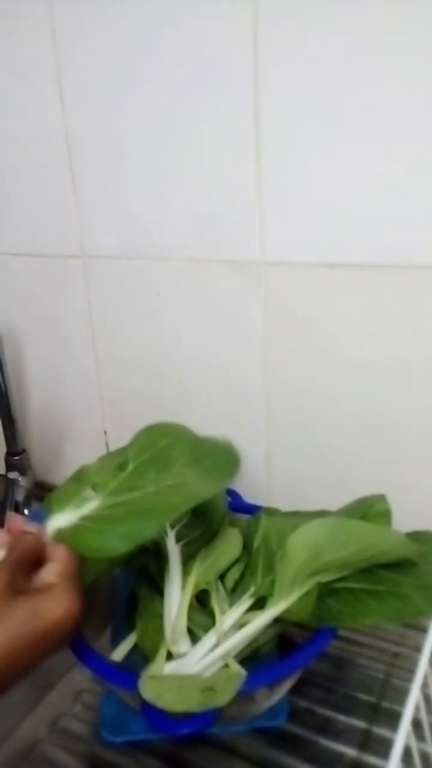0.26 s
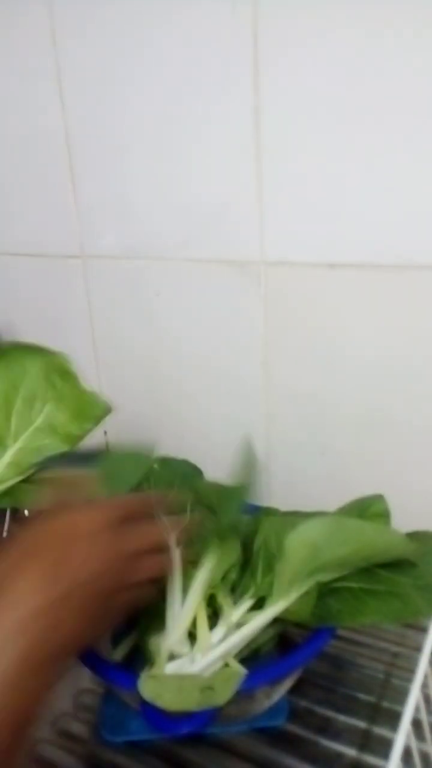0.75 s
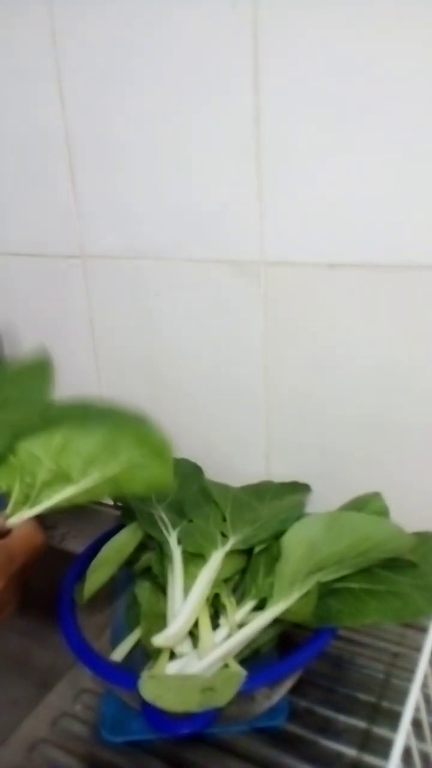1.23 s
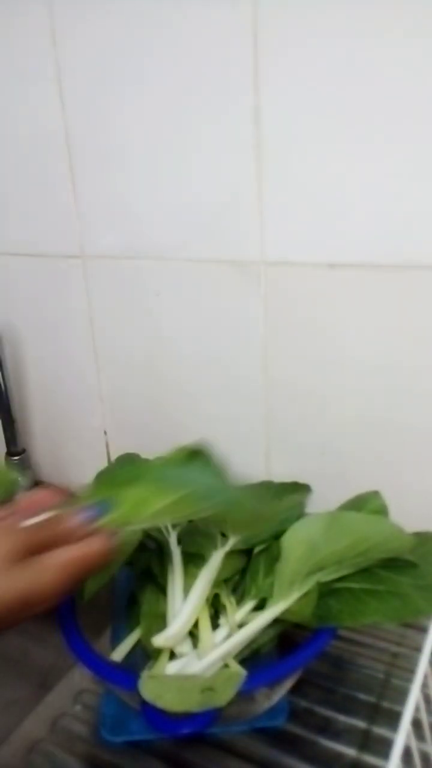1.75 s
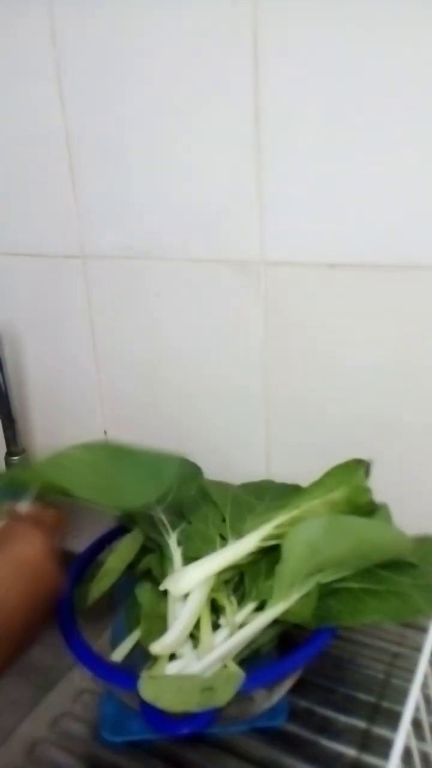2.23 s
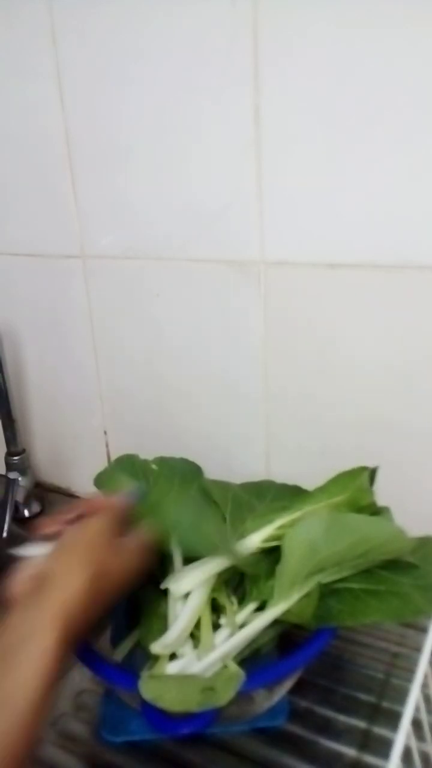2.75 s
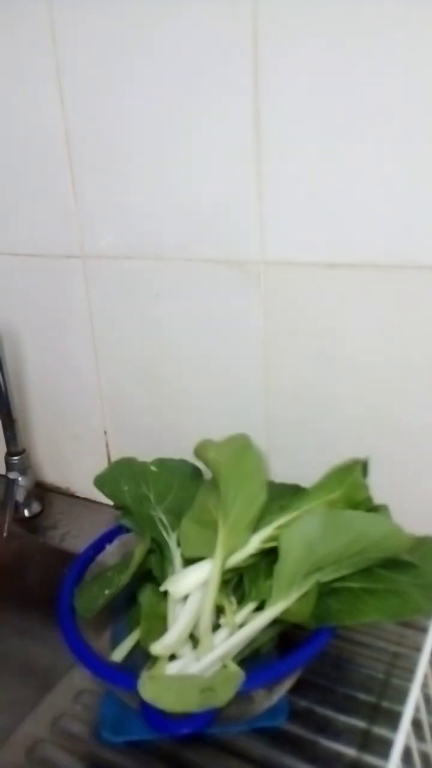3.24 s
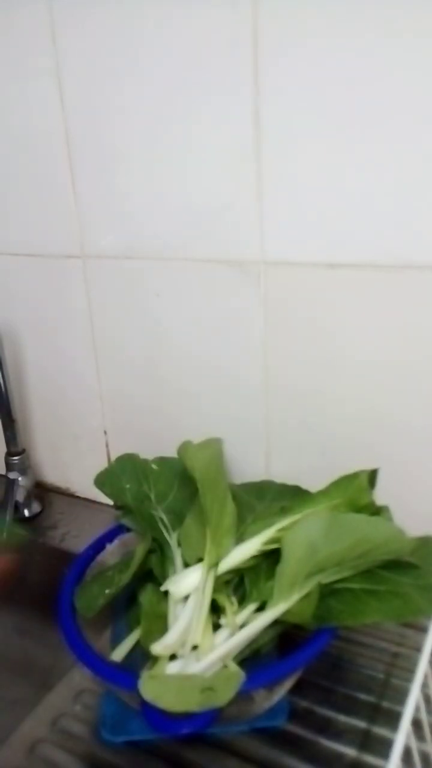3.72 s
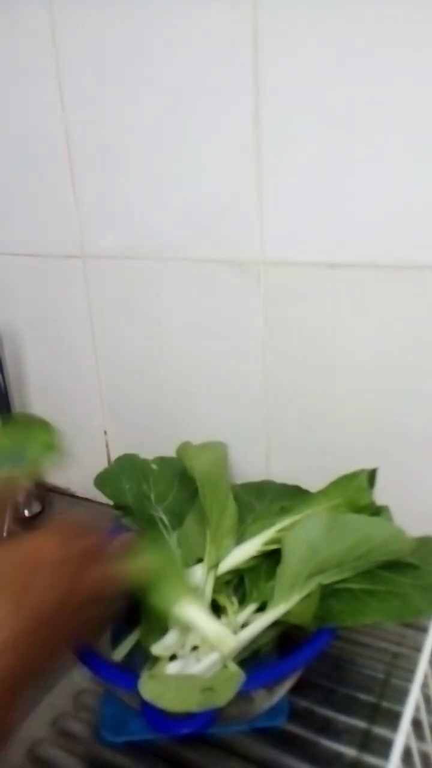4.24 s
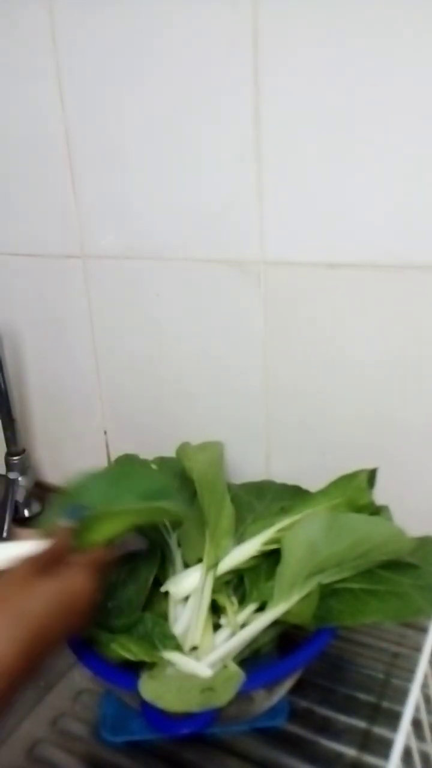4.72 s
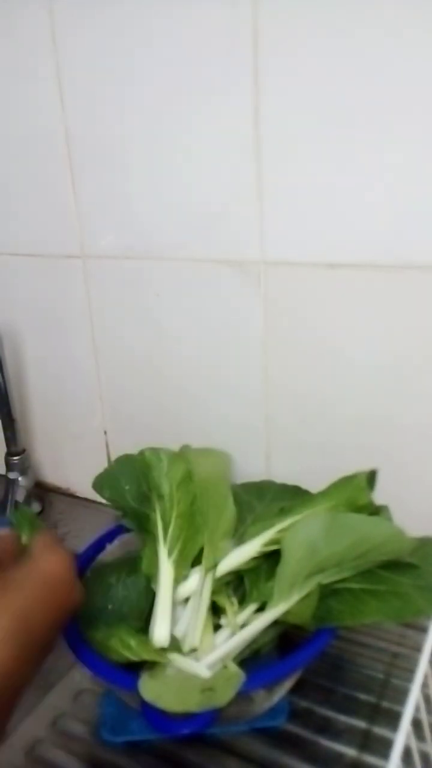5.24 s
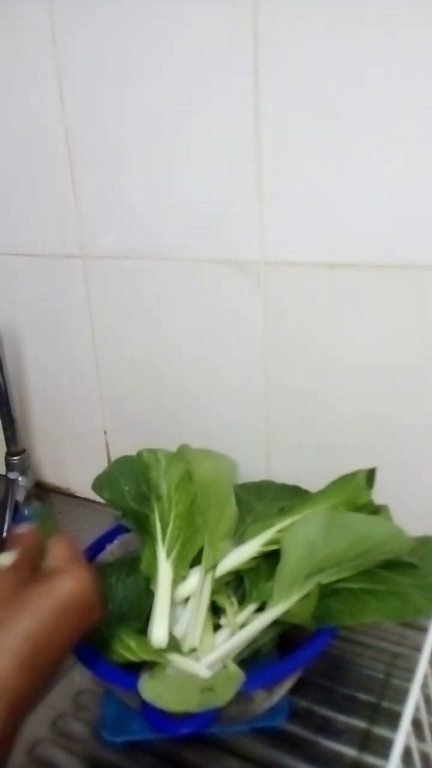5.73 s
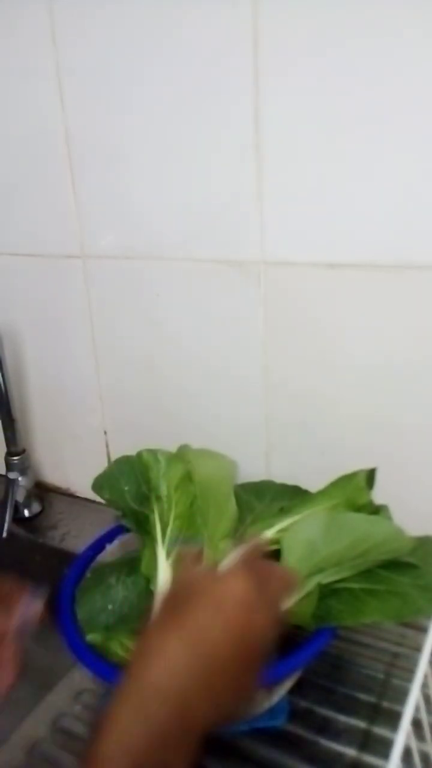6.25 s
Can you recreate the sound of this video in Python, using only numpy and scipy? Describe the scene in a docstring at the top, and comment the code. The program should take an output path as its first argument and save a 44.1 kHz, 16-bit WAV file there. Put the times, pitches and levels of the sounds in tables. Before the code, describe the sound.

Bok choy stalks snap in short, crisp clusters about once a second, with soft rubbing and crackling of wet leaves in between. A little over two seconds in, a small knife clinks once as a stalk breaks and a plastic basin knocks. More snaps, rustles and a few tiny squeaks follow. A low machine hum runs underneath, heard from nearby in a small tiled kitchen.

```python
"""At a tiled kitchen sink, bok choy leaves are snapped off with a small knife and dropped in a plastic basin.
The crisp stalks fail by brittle fracture, fibre by fibre, while stick-slip friction makes the wet leaves
rub, crackle and squeak. Impacts excite damped modes: the blade clinks once and the basin thuds softly.
Under it all a machine drones, and the small, hard room adds early reflections and a short reverberation."""
import sys
import numpy as np
from scipy import signal
from scipy.fft import rfft, irfft
from scipy.io import wavfile
from scipy.ndimage import uniform_filter1d

SR = 44100
rng = np.random.default_rng(int(sys.argv[2]) if len(sys.argv) > 2 else 0)


def file_out(sig):
    """Save sig as 16-bit WAV at sys.argv[1]."""
    # one column per channel
    cols = np.atleast_2d(sig).T
    # limit, then scale
    lim = np.clip(cols, -1, 1)
    pcm = np.round(lim * 32767).astype(np.int16)
    wavfile.write(sys.argv[1], SR, pcm)


N = 285723
TIME = np.arange(N) / SR

# Reverberation of the room. Each row: frequency in Hz, time to decay by 60 dB in seconds.
ROOM_T60 = [(200, 0.55), (1300, 0.043), (3500, 0.45), (7000, 0.3), (10000, 0.27), (15800, 0.26),
            (16500, 0.078)]
# Faint background hiss. Each row: frequency in Hz, spectral density in dB.
HISS_SPECTRUM = [(25, -100), (60, -107), (110, -89), (250, -99.5), (500, -94), (1000, -104), (1900, -111),
                 (2650, -109), (3300, -107), (3900, -118), (4800, -116), (6000, -107), (6600, -106),
                 (7050, -103), (7500, -110), (8000, -125), (10000, -128), (13800, -129), (15100, -118),
                 (15700, -118), (16050, -145)]
# The machine's low, hollow and airy resonances.
# Each row: frequency in Hz, nominal width in Hz, relative level in dB.
DRONE_MODES = [(85.4, 34, 3), (89.3, 6.6, 5), (186.5, 14.3, 14.5), (211.3, 7.4, 8.5), (346.5, 61, 16.5),
               (437.5, 19, 10)]
HOLLOW_MODES = [(571, 55, -1), (640.4, 63, 0.5), (788, 58, 2.5), (870, 71, 4.5), (1065, 35, 3),
                (1150.6, 62, 9.5), (1567.5, 42, 0), (1672, 99, -3.5)]
AIRY_MODES = [(2260, 237, 1), (2980, 75, -1.5), (3184, 193, -1), (6880, 490, -1.5)]
# Slow drift of the drone. Each row: time in seconds, level in dB.
DRONE_DRIFT = [(0, -56), (1.1, -55.5), (1.9, -53.5), (2.9, -56), (3.6, -57), (4.6, -57), (5.5, -55.5),
               (6.48, -53)]
# Brief dips and swells of the hum. Each row: centre in seconds, half width in seconds,
# change of the low hum in dB, change of the hollow part in dB.
HUM_DIPS = [(.14, 0.065, 3, 5), (.62, 0.063, 5.5, 1.5), (.95, 0.031, 7.5, 3), (1.24, 0.12, -5, -1.5),
            (1.44, 0.038, -16, 3.5), (1.58, 0.042, 2.5, 0), (1.81, 0.061, 3, 5), (2.18, 0.04, -16, -5),
            (2.5, 0.04, 2.5, 4.5), (3.02, 0.11, 2, 4), (3.29, 0.046, -7, -4.5), (3.69, 0.043, -10, -10),
            (3.86, 0.045, 3, -5), (4.0, 0.018, 3.5, 6), (4.21, 0.11, -7.5, -5), (4.42, 0.028, 4, -0.5),
            (4.78, .1, 5, 3.5), (5.08, 0.029, -25, -5), (5.26, 0.043, -6, -3.5), (5.45, 0.13, 0, 2.5),
            (5.63, 0.039, -9, 0), (5.75, 0.065, 6, 7), (5.94, 0.041, -1.5, -8), (6.07, .025, -4, -9),
            (6.39, 0.086, 2, 4)]
# Strokes of the hand through the leaves. Each row: start in seconds, length in seconds,
# gain of the fine slips in dB, gain of the dull drag in dB.
HAND_STROKES = [(0, 0.22, -62.5, -59), (0.236, 0.19, -67, -65), (0.382, 0.14, -64.5, -65.5),
                (0.59, 0.064, -65, -64), (0.746, 0.17, -60, -60), (0.983, 0.13, -55.5, -55),
                (1.342, 0.14, -60.5, -59.5), (1.576, 0.085, -69.5, -70), (1.74, 0.16, -64, -59.5),
                (1.925, 0.09, -61, -66), (2.282, 0.22, -62.5, -60.5), (2.61, 0.29, -66, -72),
                (2.977, 0.23, -68.5, -72), (3.322, 0.065, -57, -66), (3.462, 0.13, -68, -67.5),
                (3.764, 0.11, -64.5, -61.5), (3.97, 0.044, -60, -60), (4.294, 0.24, -64.5, -63),
                (4.654, 0.21, -68, -64), (5.008, 0.048, -63, -81), (5.297, 0.17, -66, -77),
                (5.65, 0.044, -64.5, -65), (6.091, 0.061, -61.5, -57.5), (6.29, 0.075, -70, -61)]
# Friction spectra of fine slips between leaves and of a hand dragging along a stalk.
# Each row: frequency in Hz, relative density in dB.
SLIP_SPECTRUM = [(600, -44), (1500, 6), (2400, 7), (4300, 3), (5200, 7), (6500, 9.5), (7400, -2),
                 (8300, -53), (13600, -45), (15000, -21), (16000, -18)]
DRAG_SPECTRUM = [(50, -6), (200, 1.5), (480, -5.5), (900, -1.5), (1350, 1.5), (1620, -1.5), (1950, -3.5),
                 (2400, -7.5), (3300, -18.5), (6000, -49)]
# Wet leaves brush past each other, and wet stalks squeak under the fingers.
# Each row: start in seconds, level in dB, pitch in Hz, length in seconds.
LEAF_BRUSHES = [(0.262, -82, 10500, .03), (0.429, -67, 5830, 0.055), (0.58, -72, 4770, 0.014),
                (0.641, -69, 5900, 0.065), (0.643, -84, 10000, .025), (0.768, -76, 6740, 0.032),
                (.815, -78, 9700, 0.016), (0.982, -81, 9800, .02), (1.152, -76, 8500, 0.021),
                (1.508, -81, 9200, 0.021), (1.923, -80, 9200, 0.045), (2.005, -80, 9500, 0.03),
                (2.037, -70, 4360, 0.025), (2.218, -79, 10300, .02), (2.531, -71, 6400, 0.016),
                (2.534, -80, 11500, 0.023), (2.696, -68, 6400, 0.051), (2.81, -84, 9700, 0.024),
                (3.777, -87, 8500, 0.091), (4.01, -81, 9800, 0.042), (5.362, -86, 10400, 0.02),
                (5.408, -75, 9000, 0.015), (5.685, -86, 9900, 0.035), (5.836, -80.5, 11600, 0.022),
                (6.093, -79, 10400, 0.037), (6.191, -83, 9300, .05), (6.324, -84, 8800, 0.038)]
STALK_SQUEAKS = [(0.236, -61, 2430, 0.01), (1.923, -50, 4030, 0.0096), (1.937, -68, 4000, 0.018),
                 (3.836, -69, 3900, 0.0062), (5.815, -73, 4470, 0.0086), (6.466, -67, 3880, 0.012)]
# Soft touches of leaf on leaf. Each row: start in seconds, level in dB, pitch in Hz,
# top-octave sheen in dB, rise time in seconds.
LEAF_TOUCHES = [(.268, -54.5, 2800, 5, .004), (.572, -55, 3300, -13, 0.0048), (.652, -55, 4500, 3, .003),
                (.675, -50, 2800, -14, 0.0049), (.805, -53, 2900, -14, 0.0039),
                (.843, -39, 4200, -6, 0.0065), (1.768, -50, 3000, -14, 0.0083),
                (1.789, -47, 3500, -11, 0.0055), (2.042, -45, 4000, -0.5, 0.0036),
                (4.998, -47, 4000, 1, 0.0065), (5.338, -52.5, 4600, -1, 0.0053),
                (5.369, -62, 5500, 5, .003), (5.414, -62, 4800, 5, 0.0049), (5.427, -44.5, 3280, -2, .002),
                (6.161, -51, 4800, 5, 0.0051), (6.204, -50, 7000, -6, 0.0044)]
# Modes of the plastic basin. Each row: ratio to the pitch, relative level in dB.
BASIN_MODES = [(.78, -18), (1, -6), (1.27, -12.5), (1.9, -14), (2.9, -25)]
# Blows on the basin. Each row: start in seconds, gain in dB, pitch in Hz, T60 at that pitch in seconds.
BASIN_BLOWS = [(2.369, -23, 456, 0.015), (3.402, -41, 173, 0.046), (4.392, -59, 186, 0.1),
               (4.403, -55, 173, 0.065)]
# Modes of the blade. Each row: frequency in Hz, relative level in dB, T60 in seconds.
BLADE_MODES = [(3624, -13, 0.15), (3735, -8, 0.072), (3800, -13, .055), (4020, -3.5, 0.046),
               (4330, -6, .03), (4800, -2.5, 0.02), (5500, 0, 0.012), (6600, -5.5, .11), (6150, -15, 0.15),
               (6595, 2.5, 0.03)]
# The blade knocks as it comes through a stalk. Each row: start in seconds, gain in dB.
BLADE_KNOCKS = [(2.3690, -30.5)]
# The spectrum all cracks share. Each row: frequency in Hz, relative density in dB.
CRACK_SPECTRUM = [(50, -21), (150, -9.5), (500, -6.5), (1000, -6.5), (1700, -3), (2600, -1.5), (3800, -6),
                  (5200, -6), (6500, 2), (7300, -4.5), (8300, -11.5), (13600, -17), (14800, -3),
                  (15800, -4), (16200, -32), (16900, -26)]
# Cracks of stalks and leaves. Each row: start in seconds, level in dB, pitch in Hz, fleshy body in dB,
# top-octave sheen in dB, glassy edge in dB, time scale of the tear in seconds.
STALK_CRACKS = [(.0038, -30, 3450, -6, 1, 1, 0.00055), (.0153, -36.5, 2870, 1, -2, -1, 0.0011),
                (.0415, -38.5, 6330, -2, -1, -3, 0.00021), (.0774, -39, 3970, -4, -1, 2, .0003),
                (.095, -45, 3120, -5, 3, 4, 0.00035), (.1189, -38, 5600, 1, 0, -2, 0.00027),
                (.1258, -35, 3840, 2, 1.5, -1, 0.00027), (.705, -46, 2350, 4, -23, -7, .0015),
                (.8637, -36, 3650, 1, -2, 3, 0.00063), (1.0144, -37, 4100, -8, 3, -6, 0.00076),
                (1.0225, -45, 3500, -6, -6, -4, 0.00056), (1.037, -31.5, 4000, 1, 2, -3, .0009),
                (1.0452, -39, 3600, -10, -3, -4, .0007), (1.0562, -33, 4000, 4, 5, -2, .0005),
                (1.064, -42, 3500, -8, -2, -3, .0008), (1.0755, -34.5, 4400, 4, 3, -1, .0009),
                (1.087, -48, 3300, 3, -4, -3, .0008), (1.099, -44, 3800, 0, 2, 0, 0.00064),
                (1.199, -49, 6200, -5, 4, 9, .0008), (1.3257, -34.5, 5030, -1, 2.5, 4, 0.0016),
                (1.343, -47, 5000, -1, 5, 1, .0004), (1.3985, -42.5, 6650, -1, -2, -6, .0012),
                (1.4423, -39, 3760, -1, 5, -4, .0023), (1.4472, -35.5, 5900, -4, -0.5, -7, 0.0013),
                (1.7827, -42, 2100, 0, -23, -12, 0.00058), (1.9683, -44, 6500, -13, -2, -8, 0.00049),
                (1.974, -43, 6660, -10, -6, 3, .0009), (2.1385, -49.5, 7500, -8, 5, 4, .0003),
                (2.2419, -43.5, 6740, -11, 9, -3, .0006), (2.2556, -43, 5370, -3, -8, 0, 0.00066),
                (2.2868, -42, 5770, 5, 5, -1, .001), (2.2945, -42.5, 6160, -7, 2, -3, 0.0016),
                (2.3688, -31, 6000, -2, 15, 0.5, 0.0014), (2.3703, -34, 4140, -8, -5, 0, .0008),
                (2.3733, -33.5, 6300, -5, -5, 3, 0.00073), (2.3767, -35.5, 3950, 5.5, -11, -2, .0012),
                (2.3864, -35.5, 4800, -1, 2, 3, .0018), (2.3975, -39, 3700, -4, 9, 2, 0.00064),
                (3.3424, -43.5, 6100, -13, -1, -3, 0.00076), (3.3591, -33, 4030, -8, 2, -5, 0.0013),
                (3.3615, -35.5, 2680, -8, -14, -2, 0.0016), (3.3715, -42, 5200, -4, 7, 2, .001),
                (3.3978, -46, 3700, 1, 10, 1, .0008), (3.403, -41.5, 4020, 3, 4, -3, 0.0011),
                (3.8427, -48, 2900, -1, -18, -6, 0.00073), (3.8515, -51, 4200, -1, -14, -6, .0015),
                (4.3178, -29, 2470, -1.5, -5, 1, .0007), (4.3202, -42, 1100, 0, -10, 0, .0008),
                (4.327, -38, 3600, -2, 3, 0, .001), (4.3372, -37.5, 4200, 1, 3, 1, .0012),
                (4.3455, -41.5, 1200, -3, -4, 0, 0.0017), (4.391, -38, 5600, -4, 6, 6, .0006),
                (4.4013, -37.5, 4000, -2, 9.5, -1, 0.00047), (5.0261, -37, 3040, -6, -0.5, -9, .0011),
                (5.0335, -47, 3300, -7, -8, -6, 0.0018), (5.0636, -39, 2820, -5, 6.5, -9, 0.00033),
                (5.0951, -46, 2950, -2, -1, -6, 0.00024), (5.46, -50, 6600, -6, 10, -7, 0.00079),
                (5.4694, -43.5, 4220, -2, 6, -2, .0016), (6.0953, -46, 7800, -23, 1, -8, 0.0011)]


def amp(db):
    """Amplitude ratio of a level in decibels."""
    return 10 ** (np.asarray(db) / 20)


def unit(x):
    """Normalisation to an rms of 1."""
    return x / np.sqrt(np.mean(x ** 2) + 1e-24)


def at_level(sound, level_db, hold_s=0.0017):
    """Equal energy: a transient gets the energy of level_db sustained for hold_s."""
    return amp(level_db) * sound * np.sqrt(hold_s * SR / np.sum(sound ** 2))


def read(points, hz):
    """Interpolation of a table on a logarithmic frequency axis."""
    f, value = np.transpose(points)
    return np.interp(np.log(hz + 1), np.log(f + 1), value)


def add(mix, start, sound):
    """Superposition: a sound joins the mix at its start in seconds."""
    part = mix[max(round(start * SR), 0):][:len(sound)]
    part += sound[:len(part)]


def noise(gain):
    """Spectral shaping of white noise by the function gain(Hz)."""
    return irfft(rfft(rng.standard_normal(N)) * gain(np.fft.rfftfreq(N, 1 / SR)), N)


def wander(rate_hz):
    """Slow random modulation with an rms of 1."""
    knots = rng.standard_normal(2048)
    return unit(np.interp(2 * rate_hz * TIME, np.arange(len(knots)), knots))


def click(colour, size=1024):
    """Minimum phase gives the sharpest causal pulse with the spectrum colour(Hz) in dB."""
    log_gain = np.log(amp(colour(abs(np.fft.fftfreq(size, 1 / SR)))))
    return np.fft.ifft(np.exp(np.conj(signal.hilbert(log_gain)))).real


def kitchen(x, early_db=-6, early_fade_s=0.0066, build_s=0.0003, echoes=14, taps_per_s=5000):
    """Reverberation: near tiles return single echoes, and a diffuse tail decays exponentially."""
    t = np.arange(SR * 3 // 4) / SR
    taps = rng.choice([-1., 1.], len(t)) * (rng.random(len(t)) < taps_per_s / SR)
    taps *= 1 - np.exp(-(t / build_s) ** 2)
    hz, age, spectra = signal.stft(taps, SR, nperseg=256)
    decay = np.exp(-np.log(1000) * age / read(ROOM_T60, hz)[:, None])
    tail = signal.istft(spectra * decay, SR, nperseg=256)[1]
    delays = np.geomspace(.003, .028, echoes) * rng.uniform(0.82, 1.2, echoes)
    early = np.zeros(len(tail))
    early[(delays * SR).astype(int)] = rng.choice([-1, 1], echoes) * np.exp(-delays / early_fade_s / 2)
    response = tail / np.linalg.norm(tail) + amp(early_db) * early / np.linalg.norm(early)
    return signal.oaconvolve(x, response)[:N]


def wall(x, delay_s=0.001301, reflection=0.45):
    """Comb filtering: a far sound interferes with its echo from the tiled wall and turns hollow."""
    return (x + reflection * np.interp(TIME - delay_s, TIME, x)) / np.sqrt(1 + reflection ** 2)


def hum_dips():
    """Amplitude modulation: Gaussian dips and swells in dB, for the low hum and for the hollow part."""
    return sum(np.outer(changes_db, np.exp(-((TIME - centre) / width) ** 2))
               for centre, width, *changes_db in HUM_DIPS)


def air(dip_share=0.15, patch_db=2.1, patch_bins=7, patch_frames=24):
    """Modulated noise: a faint hiss wavers in patches of time and frequency and dips with the hum."""
    spectra = signal.stft(noise(lambda f: amp(read(HISS_SPECTRUM, f))), nperseg=512)[2]
    patches = uniform_filter1d(rng.standard_normal(spectra.shape), patch_bins, axis=0)
    patches = unit(uniform_filter1d(patches, patch_frames, axis=1))
    hiss = signal.istft(spectra * amp(patch_db * patches), nperseg=512)[1][:N]
    return np.sqrt(SR / 2) * hiss * amp(dip_share * hum_dips()[1])


def resonance(hz, width_hz):
    """Forced vibration: turbulence drives one resonance, giving narrow-band noise with an rms of 1."""
    pole = np.exp((2j * np.pi * hz - np.pi * width_hz) / SR)
    return unit(signal.lfilter([1], np.poly([pole, pole]), rng.standard_normal(N)).real)


def ringing(modes, flutter_db, flutter_hz):
    """Modal superposition: noise-driven resonances, each fluttering in level on its own."""
    return unit(sum(resonance(hz, 1.274 * width) * np.sqrt(width)
                    * amp(db + flutter_db * np.tanh(wander(flutter_hz))) for hz, width, db in modes))


def machine(throb_hz=142, throb_width_hz=28, throb_db=-56.3, hollow_db=-60, airy_db=-67):
    """Narrow-band noise is heard as hum: a low throb, a drone, a hollow churn and a thin airy rush."""
    band = noise(lambda f: 1 / (1 + ((f - throb_hz) / throb_width_hz * 2) ** 6) ** .5)
    analytic = signal.hilbert(unit(band))
    throb = unit(analytic.real / (abs(analytic) + 0.11) ** 0.18)  # partly evens out the envelope
    drone = ringing(DRONE_MODES, flutter_db=4.0, flutter_hz=11)
    hollow = ringing(HOLLOW_MODES, flutter_db=5.5, flutter_hz=16)
    waver_db = 0.8 * wander(11)
    low_dip_db, hollow_dip_db = hum_dips()
    drift_db = np.interp(TIME, *np.transpose(DRONE_DRIFT))
    return (throb * amp(throb_db + low_dip_db)
            + drone * amp(drift_db + 0.3 * low_dip_db + waver_db)
            + hollow * amp(hollow_db + hollow_dip_db + waver_db)
            + ringing(AIRY_MODES, flutter_db=4.0, flutter_hz=14) * amp(airy_db))


def hand_strokes(rise_s=0.034, release_s=0.075, held_slip_db=-82.5, held_drag_db=-84):
    """Incoherent sources add in power: strokes rise, hold and fade, giving the gains of slip and drag."""
    power = amp([[held_slip_db], [held_drag_db]]) ** 2 * np.ones(N)  # even held leaves stir a little
    for start, length, slip_db, drag_db in HAND_STROKES:
        grip = np.clip((TIME - start) / rise_s, 0, 1)
        settle = np.exp(-np.clip((TIME - start - length) / release_s, 0, 20))
        power += (amp([[slip_db], [drag_db]]) * grip * settle) ** 2
    return np.sqrt(power)


def slips(colour, per_s, spread_db, clump_db):
    """Stick-slip friction releases tiny pulses of uneven size, louder in clumps."""
    train = (rng.random(N) < per_s / SR) * rng.choice([-1, 1], N)
    size_db = spread_db * np.minimum(rng.exponential(1, N), 4.5) + clump_db * np.tanh(wander(23))
    return unit(signal.oaconvolve(train * amp(size_db), click(colour))[:N])


def leaves(slip_gain, drag_gain, slip_db=-6.5, drag_db=-3, patch_octaves=0.45):
    """Friction noise: patches of leaf slip independently, each in its own band, over the hand's drag."""
    patches = np.zeros(N)
    for hz in np.geomspace(1800, 14000, 6):
        def band_db(f):
            return np.maximum(-6 * (np.log2((f + 1) / hz) / patch_octaves) ** 2, -40)
        patches += slips(band_db, per_s=260, spread_db=2.5, clump_db=2.5) * np.sqrt(hz)
    hiss = unit(signal.oaconvolve(patches, click(lambda f: read(SLIP_SPECTRUM, f)))[:N])
    drag = slips(lambda f: read(DRAG_SPECTRUM, f), per_s=1100, spread_db=2, clump_db=8.0)
    return hiss * amp(slip_db) * slip_gain + drag * amp(drag_db) * drag_gain


def crackle(slip_gain, level_db=-7, per_s=55, spread_db=3.0, rise_cycles=4.0, pitches=16):
    """A Poisson process scatters wet ticks through the rubbing, each a tone burst with a soft start."""
    out, t = np.zeros(N), np.arange(400) / SR
    for hz in np.geomspace(2500, 9500, pitches):
        onsets = rng.random(N) < per_s / pitches / SR
        sizes = amp(spread_db * np.minimum(rng.exponential(1, N), 3))
        age = hz * t / rise_cycles
        tick = np.sin(2 * np.pi * hz * t) * age ** 2 * np.exp(-2 * age)
        out += signal.oaconvolve(onsets * sizes, tick * amp(read(SLIP_SPECTRUM, hz) / 2))[:N]
    return unit(out) * amp(level_db) * slip_gain


def grainy_noise(size, grain_db, grain_samples):
    """Fast random amplitude modulation breaks white noise into grains."""
    rush, grain = rng.standard_normal((2, size))
    return rush * amp(grain_db * unit(uniform_filter1d(grain, size=grain_samples)))


def brushes(width_hz=3000):
    """Sliding friction between wet leaves gives brief, grainy hisses, each around its own pitch."""
    out = np.zeros(N)
    for start, level_db, hz, length in LEAF_BRUSHES:
        swell = signal.windows.hann(max(int(length * SR), 128))
        rush = grainy_noise(len(swell), grain_db=16.0, grain_samples=70)
        pole = np.exp((2j * np.pi * hz - np.pi * width_hz) / SR)
        hiss = signal.lfilter([1], np.poly([pole, pole, pole]), rush).real
        add(out, start, amp(level_db) * unit(swell * hiss))
    return out


def squeaks(pitch_waver=0.081):
    """Stick-slip oscillation of a finger on a wet stalk is fast enough to make an unsteady whistle."""
    out = np.zeros(N)
    for start, level_db, pitch_hz, length in STALK_SQUEAKS:
        swell = signal.windows.hann(max(int(length * SR), 16))
        jitter = unit(uniform_filter1d(rng.standard_normal(len(swell)), size=14))
        phase = 2 * np.pi * np.cumsum(pitch_hz * (1 + pitch_waver * jitter)) / SR
        add(out, start, amp(level_db) * unit(swell * np.sin(phase)))
    return out


def stalk_colour(f, pitch_hz, body_db, sheen_db, edge_db, ring_db=7, ring_octaves=0.68, body_hz=1250):
    """The stalk acts as a filter, in dB: a broad resonance, a fleshy body, and sheen and edge on top."""
    ring = ring_db * np.exp(-(np.log2((f + 1) / pitch_hz) / ring_octaves) ** 2)
    flesh = body_db * np.exp(-np.log2((f + 1) / body_hz) ** 2)
    sheen = sheen_db * np.clip((f - 7300) / 1800, 0, 1)
    edge = edge_db * np.clip((f - 11000) / 4000, 0, 1.5)
    return read(CRACK_SPECTRUM, f) + ring + flesh + sheen + edge


def touches(body_db=-3, edge_db=-4, size=2048):
    """A leaf folds against its neighbours: many tiny slips superpose into a blurred rustle."""
    out = np.zeros(N)
    for start, level_db, pitch_hz, sheen_db, rise in LEAF_TOUCHES:
        age = np.arange(size) / SR / rise
        rush = grainy_noise(size, grain_db=4, grain_samples=30) * age ** 2 * np.exp(-2 * age)
        leaf = click(lambda f: stalk_colour(f, pitch_hz, body_db, sheen_db, edge_db))
        add(out, start, at_level(signal.fftconvolve(rush, leaf), level_db))
    return out


def basin(rise_s=0.00077):
    """The impact of a stalk or hand excites damped modes of the plastic; higher modes decay sooner."""
    out, t = np.zeros(N), np.arange(SR // 2) / SR
    for start, gain_db, pitch_hz, t60 in BASIN_BLOWS:
        ring = sum(amp(db) * np.sin(2 * np.pi * ratio * pitch_hz * t)
                   * np.exp(-np.log(1000) * t * np.sqrt(ratio) / t60) for ratio, db in BASIN_MODES)
        add(out, start, amp(gain_db) * ring * (1 - np.exp(-t / rise_s)))
    return out


def knife():
    """Free vibration: the knocked blade rings in inharmonic modes, which the hand quickly damps."""
    out, t = np.zeros(N), np.arange(SR // 4) / SR
    ring = sum(amp(db) * np.sin(2 * np.pi * (hz * t + rng.random())) * np.exp(-np.log(1000) * t / t60)
               for hz, db, t60 in BLADE_MODES)
    for start, gain_db in BLADE_KNOCKS:
        add(out, start, amp(gain_db) * ring)
    return out


def crack(level_db, pitch_hz, body_db, sheen_db, edge_db, tear_s, hard_db=-42, rush_hz=7000, size=1024):
    """Brittle fracture: one fibre gives way and its neighbours follow in a rush, ringing the stalk."""
    fibres = rng.standard_normal(size) * np.exp(-np.arange(size) / SR / (2.4 * tear_s))
    fibres = signal.lfilter(*signal.butter(1, rush_hz, fs=SR), fibres)
    # the first fibre carries the crisp top; a crack lighter than hard_db starts more gently
    fibres[0] = 1.92 * amp(0.4 * min(level_db - hard_db, 0))
    # the fibres' broad spectrum is divided out, so the colour comes from the stalk
    fibres_db = 10 * np.log10(uniform_filter1d(abs(np.fft.fft(fibres)) ** 2, size=15, mode="wrap"))
    stalk = click(lambda f: stalk_colour(f, pitch_hz, body_db, sheen_db, edge_db) - fibres_db, size)
    return at_level(signal.fftconvolve(fibres, stalk), level_db)


def stalks(places=4, after_db=-16, max_wait_s=0.0187, scatter_octaves=0.49, room_db=-4.5, firm_db=-46.5):
    """Fracture cascades: two weaker fibres follow each crack. Returns direct sound and room feeds."""
    direct, to_room = np.zeros(N), np.zeros((places, N))
    for k, (start, level_db, pitch_hz, body_db, sheen_db, edge_db, tear_s) in enumerate(STALK_CRACKS):
        waits = np.cumsum(rng.uniform(0, max_wait_s, 2))
        shifts = scatter_octaves * rng.standard_normal(2)
        followers = [(wait, after_db, octaves) for wait, octaves in zip(waits, shifts)]
        # faint cracks, deep in the leaves, are more diffuse
        room_gain = amp(room_db + 0.086 * (firm_db - level_db))
        for wait, under_db, octaves in [(0.00016, 0, 0)] + followers:
            sound = crack(level_db + under_db, pitch_hz * 2 ** octaves, body_db, sheen_db, edge_db, tear_s)
            add(direct, start + wait, sound)
            add(to_room[k % places], start + wait, sound * room_gain)
    return direct, to_room


def scene(rustle_room_db=1, touch_room_db=-3, basin_room_db=-3, knife_room_db=-6):
    """Direct and reverberant fields of the handwork superpose on the machine's drone and a faint hiss."""
    cracks, cracks_to_room = stalks()
    slip_gain, drag_gain = hand_strokes()
    rustle = leaves(slip_gain, drag_gain) + crackle(slip_gain) + brushes() + squeaks()
    folds, thuds, clink = touches(), basin(), knife()
    room = sum(kitchen(place) for place in cracks_to_room)  # each place has its own echoes
    room += kitchen(amp(rustle_room_db) * rustle + amp(touch_room_db) * folds
                    + amp(basin_room_db) * thuds + amp(knife_room_db) * clink)
    return (cracks + rustle + folds + thuds + clink + room + wall(machine()) + air())[None]


def record(dry, low_cut_hz=62, high_cut_hz=16900):
    """Band limiting: a small microphone loses the deep bass, and a steep filter cuts the top treble."""
    thin = signal.sosfilt(signal.butter(3, low_cut_hz, "high", fs=SR, output="sos"), dry)
    low_pass = signal.firwin(255, high_cut_hz, window=("kaiser", 9), fs=SR)
    return signal.oaconvolve(thin, low_pass[None], "same")


dry = scene()
out = record(dry)
file_out(out)
```